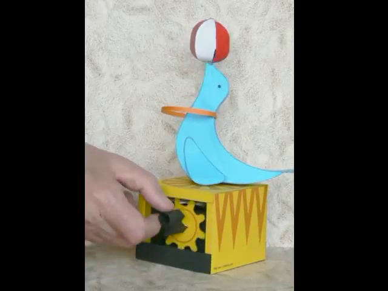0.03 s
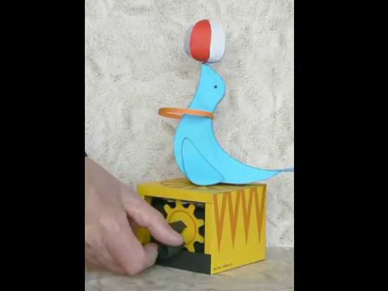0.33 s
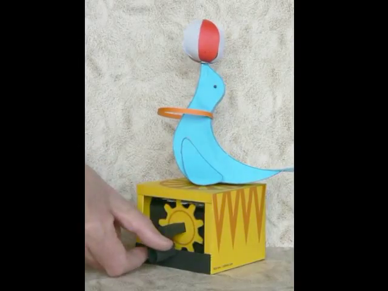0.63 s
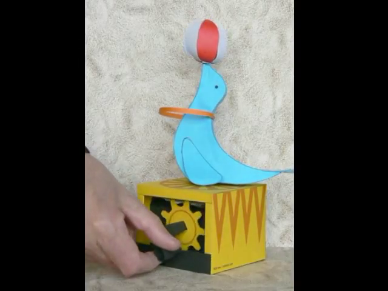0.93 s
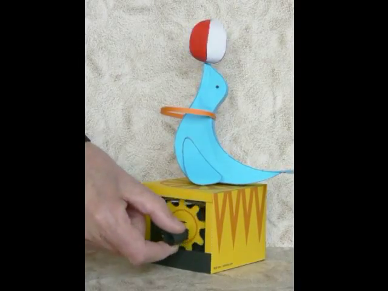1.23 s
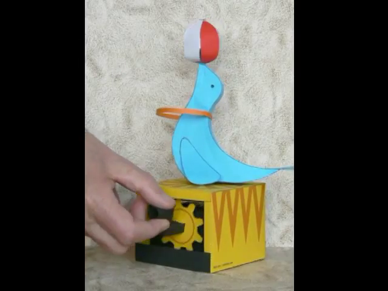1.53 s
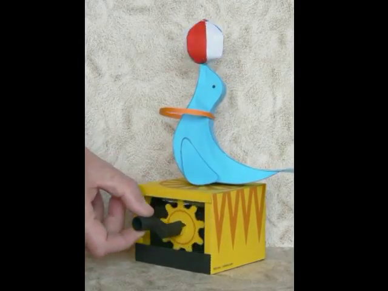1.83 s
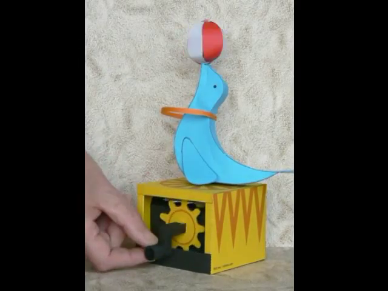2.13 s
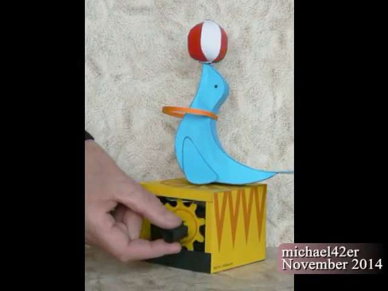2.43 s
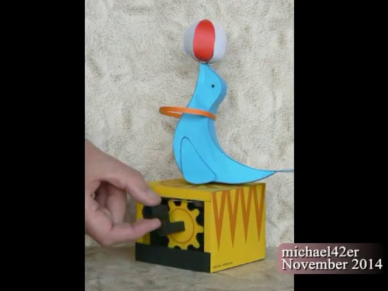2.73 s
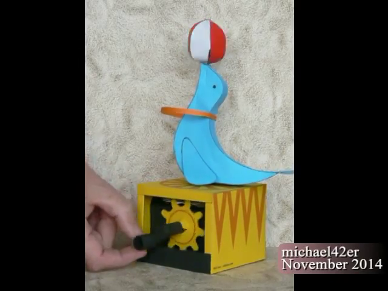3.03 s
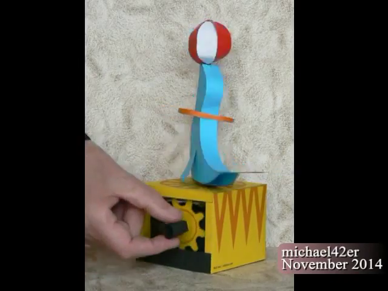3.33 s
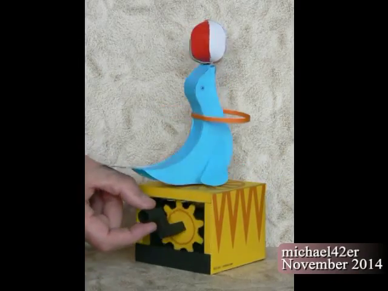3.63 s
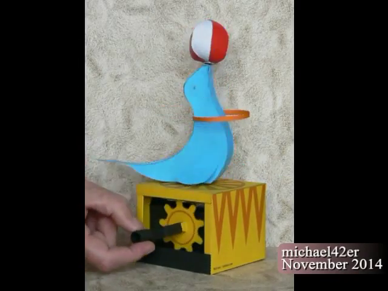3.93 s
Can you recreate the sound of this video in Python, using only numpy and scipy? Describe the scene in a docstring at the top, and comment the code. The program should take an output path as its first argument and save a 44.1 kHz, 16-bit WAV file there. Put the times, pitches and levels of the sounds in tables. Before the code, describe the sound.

Brief creaking squeaks come and go unevenly as a hand turns the card axle of a paper toy. Faint gear rubbing, soft brushes and dull finger bumps lie underneath, with steady hiss and a nearby microphone in a small room.

```python
"""A small, quiet room, where a hand cranks the card gears of a paper toy.
The card axle sticks and slips in its bearing: short gliding squeaks, some clean, some rasping.
Under them the gears rub and sound the hollow box, card brushes card, and fingers bump the box softly.
Steady hiss lies behind. A small camera holds each sample of a slow converter,
which mirrors the squeaks into a glassy treble."""
import sys
import numpy as np
from scipy import signal
from scipy.fft import rfft, irfft
from scipy.io import wavfile

SR = 44100
rng = np.random.default_rng(int(sys.argv[2]) if len(sys.argv) > 2 else 0)


def store_wav(level_fs):
    """Save 16-bit WAV to argv[1]."""
    pcm = np.round(np.clip(np.atleast_2d(level_fs), -1, 1) * 32767)
    wavfile.write(sys.argv[1], SR, pcm.T.astype(np.int16))


N = 176400
FREQS = np.arange(N // 2 + 1) * SR / N


def undb(db):
    """Decibels to gain."""
    return 10 ** (np.asarray(db) / 20)


def unit(x):
    """Scale to rms 1."""
    return x / np.sqrt(np.mean(x ** 2))


def colour(x, points):
    """EQ along a curve of points: f/Hz, gain/dB."""
    hz, db = np.array(points, float).T
    return irfft(rfft(x) * undb(np.interp(np.log(FREQS + 1), np.log(hz), db)), N)


def wander(rate_hz):
    """Smooth random modulator with rms 1 and softened peaks."""
    smooth = irfft(rfft(rng.standard_normal(N)) * np.exp(-(FREQS / rate_hz) ** 2), N)
    return unit(np.tanh(unit(smooth) / 2))


def card_box(x):
    """The hollow card box resonates in broad modes of alternating polarity."""
    # box modes: f/Hz, width/Hz, gain/dB
    modes = [(130, 124, -19), (241, 87, -2), (426, 52, 2.5), (561, 23, 1.5), (635, 76, 1), (744, 90, 2.5),
             (856, 67, 5.5), (979, 49, 2.5), (1253, 70, -0.5), (2270, 1800, -14.5)]
    f = FREQS + 1
    response = sum((-1) ** k * undb(db) / (1 + 1j * (f * f - hz * hz) / (f * width))
                   for k, (hz, width, db) in enumerate(modes))
    return irfft(rfft(x) * response, N)


def gear_rubbing(t):
    """Paper fibres catch in dense tiny ticks that sound the box."""
    # fader curve of the rubbing: t/s, relative level/dB
    fader = [(0.0, -51), (0.03, -50.5), (0.32, -52), (0.38, -56.5), (0.46, -58), (0.91, -63.5), (1.0, -47),
             (1.08, -53.5), (1.17, -50), (1.25, -55), (1.53, -49.5), (1.56, -52), (2.51, -49.5),
             (2.55, -44), (2.62, -54.5), (2.88, -48), (3.56, -53), (3.66, -46), (3.71, -53.5), (3.91, -54),
             (3.97, -41), (4.0, -63)]
    trim_db, flicker_db, graininess = 4.5, 1.33, 0.29
    ticks = rng.standard_normal(N) * np.exp(graininess * wander(420))
    when, db = np.array(fader).T
    return unit(card_box(ticks)) * undb(np.interp(t, when, db) + trim_db + flicker_db * wander(25))


def hiss():
    """A steady bed of soft noise."""
    # tone of the hiss: f/Hz, gain/dB
    eq = [(20, 3), (60, -6.5), (150, 1), (400, -5.5), (800, -4), (1500, -3), (2500, -4.5), (4000, -6.5)]
    return undb(-45) * unit(colour(rng.standard_normal(N), eq))


def axle_squeaks(t):
    """Stick-slip tones; an uneven grip shakes pitch and level, skips every other slip and adds grit."""
    # squeaks: t/s, length/s, start f/Hz, middle f/Hz, end f/Hz, level/dB,
    # 2nd harmonic/dB and 3rd harmonic/dB re the fundamental, roughness/0-1
    squeaks = [ (0.033, 0.024, 1310, 1153, 1050, -36.5, -6, -21, 0.23),
               (.053, 0.021, 1012, 999, 934, -32, -12, -23, 0.36),
               (0.387, 0.09, 1306, 1262, 1280, -42.5, -18, -20, 0.31),
               (0.418, 0.022, 1270, 1288, 1294, -22.5, -25, -41, 0.07),
               (0.427, 0.022, 1289, 1300, 1295, -21, -12.5, -21, 0.14),
               (0.447, 0.033, 1273, 1259, 1302, -24, -8.5, -19, 0.32),
               (.470, 0.013, 1262, 1408, 1462, -26, 0.5, -12, 0.25),
               (0.484, 0.036, 1528, 1444, 1466, -31.5, -14.5, -22, 0.36),
               (0.466, 0.065, 1298, 1257, 1266, -37.5, -14, -33, 0.54),
               (0.944, 0.034, 1267, 1217, 1090, -50, -25, -17, 0.35),
               (.986, 0.034, 1110, 1072, 1075, -37, -29, -21, 0),
               (1.169, 0.021, 1357, 1258, 1250, -42, -22, -22, 0.16),
               (1.195, 0.036, 982, 987, 963, -27.5, -17.5, -30, 0.14),
               (1.338, 0.049, 1003, 890, 834, -29.5, -20, -17.5, 0.25),
               (1.37, 0.021, 845, 782, 750, -25, -11, -21, 0.1),
               (1.387, 0.031, 769.5, 741.5, 766, -29.5, -11, -28, 0.18),
               (1.507, 0.018, 1279, 1235, 1070, -29, -16, -20, 0.17),
               (1.519, 0.029, 1036, 1026, 1050, -31.5, -10.5, -18.5, 0.17),
               (1.562, 0.035, 1118, 1154, 1176, -37, -17, -21.5, 0.22),
               (1.739, 0.018, 1322, 1262, 1400, -29, -18, -26, 0.17),
               (1.767, .015, 1276, 1316, 1320, -30, -16, -26, .08),
               (1.854, .014, 1004, 991, 905, -20.5, -14, -23.5, 0.06),
               (1.868, 0.028, 861, 812, 785, -24.5, -16.5, -14.5, 0.3),
               (1.898, 0.026, 766, 782, 793, -28.5, -25, -17, 0.48),
               (1.915, 0.0378, 953, 970, 1004, -26, -19, -44, 0.23),
               (1.947, 0.027, 987, 1088, 1104, -32, -10.5, -11, 0.14),
               (1.966, 0.046, 1100, 1120, 1063, -26.5, -21, -25, 0.1),
               (2.022, 0.036, 1104, 1028, 1090, -34, -23, -41, 0.35),
               (2.063, 0.032, 1257, 1260, 1283, -31.5, -23.5, -31, 0.1),
               (2.281, 0.04, 1007, 999, 976, -40.5, -16, -32, 0.55),
               (2.328, 0.027, 919, 859, 850, -37, -29, -37, 0.42),
               (2.376, 0.032, 1009, 1058, 1010, -34.5, -28, -16, 0.4),
               (2.39, 0.022, 1071, 1009, 1032, -29, -7, -25, 0.36),
               (2.414, 0.037, 981, 1031, 1028, -33, -3.5, -17, 0.3),
               (2.507, 0.045, 1106, 1060, 926, -29, -18, -19, 0.1),
               (2.538, 0.05, 1014, 990, 959, -24, -20.5, -29, 0.04),
               (2.614, 0.014, 960, 960, 1000, -30.5, -27, -30, 0.2),
               (2.637, 0.021, 1199, 1190, 1220, -32, -10, -25, 0.42),
               (2.652, 0.018, 1250, 1175, 1155, -28.5, -6, -19, 0.35),
               (2.672, 0.041, 1161, 1114, 1180, -32.5, -7.5, -17, 0),
               (2.858, 0.028, 1302, 1306, 1330, -35.5, -22, -36, .9),
               (2.971, .014, 990, 948, 920, -22.5, -19.5, -18, 0.07),
               (2.985, 0.018, 910, 873, 840, -26.5, -13.5, -20, 0.23),
               (3.018, 0.0078, 843, 938, 890, -30, -28, -31, 0.24),
               (3.034, 0.0073, 877, 855, 905, -22, -34, -37, 0.06),
               (3.087, 0.02, 973, 950, 936, -37.5, -24, -20, 0.2),
               (3.313, 0.036, 988, 956, 940, -36.5, -17, -28, 0.28),
               (3.368, 0.052, 834, 770, 843, -35.5, -21, -21, 0.52),
               (3.431, 0.047, 1454, 1322, 1310, -45.5, -24, -23, 0.9),
               (3.498, 0.028, 1132, 1095, 1060, -32, -26, -30, 0.15),
               (3.693, 0.037, 1370, 1285, 1240, -47.5, -10.5, -29, 0.47),
               (3.788, 0.014, 1290, 1297, 1300, -41, -18, -25, 0.42),
               (3.853, 0.016, 1506, 1400, 1404, -30.5, -10.5, -22, 0),
               (3.87, .060, 1369, 1269, 1200, -28.5, -4.5, -16, 0.31),
               (3.921, 0.028, 973, 750, 659, -32, -28, -16, 0.45),
               (3.951, .022, 1159, 1213, 1246, -28, -1, -10, 0.25),
               (3.978, 0.042, 1235, 1210, 1270, -24.5, -5, -17, 0.25), ]
    # skipped-slip tones at 0.5, 1.5 and 2.5 times the pitch: relative level/dB
    skip_levels = [-15, -13.5, -17]
    # tone of the grit: f/Hz, gain/dB
    grit_eq = [(200, -9), (500, -23), (750, 8), (1200, -59), (1900, -34), (2700, -10), (4000, -28.5)]
    attack_s, release_s, rolloff_db = 0.016, 0.019, -10
    jitter_share, flutter_db, rasp_db = 0.045, 8, -9  # at full roughness
    jitter, flutter, skip = wander(300), wander(160), wander(123)
    shimmer = [undb(2 * wander(60)) for _ in range(5)]
    grit = unit(colour(rng.standard_normal(N), grit_eq))
    out = np.zeros(N)
    for start, length, start_hz, mid_hz, end_hz, db, second_db, third_db, rough in squeaks:
        i = np.flatnonzero((t > start - attack_s / 2) & (t < start + length + release_s / 2))
        age = t[i] - start
        u = np.clip(age / length, 0, 1)
        # the glide bends through all three pitches
        hz = start_hz * (1 - u) * (1 - 2 * u) + mid_hz * 4 * u * (1 - u) + end_hz * u * (2 * u - 1)
        phase = 2 * np.pi * np.cumsum(hz * (1 + jitter_share * rough * jitter[i])) / SR
        fade_in = np.clip(age / attack_s + .5, 0, 1) ** 2
        fade_out = np.clip((length - age) / release_s + .5, 0, 1)
        harmonics_db = [0, second_db, third_db, third_db + rolloff_db, third_db + 2 * rolloff_db]
        tone = sum(undb(d) * shimmer[k][i] ** min(k + rough, 1) * np.sin((k + 1) * phase)
                   for k, d in enumerate(harmonics_db))
        growl = skip[i] * sum(undb(d) * np.sin((k + .5) * phase) for k, d in enumerate(skip_levels))
        shake = unit(undb(flutter_db * rough * flutter[i]))
        voice = np.sqrt(2) * (tone * shake + rough * growl)
        rasp = rough * undb(rasp_db) * grit[i]
        out[i] += undb(db) * fade_in * fade_out * (voice + rasp)
    return out


def card_slides(t):
    """Card faces brush each other in soft, grainy swishes."""
    # swishes: middle t/s, length/s, level/dB
    swishes = [(0.157, 0.031, -54), (2.405, 0.28, -60), (2.842, 0.032, -50.5), (3.248, 0.073, -42.5),
               (3.408, .10, -55), (3.653, 0.15, -48.5), (3.76, .04, -54)]
    # tone of card on card: f/Hz, gain/dB
    eq = [(300, -29), (800, 15), (1400, 2), (2100, 15), (2800, 4), (4000, -1.5)]
    swell = sum(undb(db) * np.exp(-2 * ((t - middle) / length) ** 2) for middle, length, db in swishes)
    friction = rng.standard_normal(N) * np.exp(0.15 * wander(400))
    return swell * unit(colour(friction, eq))


def finger_bumps(t):
    """The box flexes under the fingers in dull, quickly damped bumps."""
    # bumps: t/s, relative level/dB, f/Hz
    bumps = [(0.156, -46.5, 156), (0.996, -44.5, 238), (1.786, -47.5, 150), (3.635, -44, 481),
             (3.667, -46, 410), (3.775, -44, 143), (3.799, -52, 129)]
    attack_s, decay_s = 0.002, 0.018
    wobble = 1.3 * wander(89)
    out = np.zeros(N)
    for start, db, hz in bumps:
        age = np.maximum(t - start, 0)
        envelope = 2 * (1 - np.exp(-age / attack_s)) * np.exp(-age / decay_s)
        out += undb(db) * envelope * np.sin(2 * np.pi * hz * age + wobble)
    return out


def room(x, t):
    """Nearby walls add a short, dense tail."""
    t60_s, wet_db, predelay_s, build_s = 0.26, -7.5, 0.004, 0.01
    tail = rng.standard_normal(N) * undb(-60 * t / t60_s)
    tail *= np.clip((t - predelay_s) / build_s, 0, 1)
    tail /= np.sqrt(np.sum(tail ** 2))
    return x + undb(wet_db) * signal.fftconvolve(x, tail)[:N]


def scene():
    """The toy in its room over steady hiss, almost mono with a faint flicker of width."""
    # stereo side signal: f/Hz, level/dB re the mid
    side_eq = [(30, -33), (120, -42), (1000, -30), (2200, -27), (4000, -37.5)]
    balance_db = -0.07  # left re right
    t = np.arange(N) / SR
    toy = axle_squeaks(t) + gear_rubbing(t) + card_slides(t) + finger_bumps(t)
    mid = room(toy, t) + hiss()
    side = colour(mid, side_eq) * wander(260)
    return np.array([(mid + side) * undb(balance_db / 2), (mid - side) * undb(-balance_db / 2)])


def record(dry):
    """A slow converter holds each sample as a step and sits off zero; the top is cut."""
    hold_hz, mirror_boost_db, top_hz, dc_offset = 8000, 1.3, 15500, -0.045
    slow = signal.resample(dry, N * hold_hz // SR, axis=1)
    steps = signal.resample(np.repeat(slow, 20, axis=1), N, axis=1)  # steps mirror the sound upward
    bright = irfft(rfft(steps) * undb(mirror_boost_db * (FREQS > hold_hz / 2)), N)
    high_cut = signal.ellip(10, .2, 80, top_hz, fs=SR, output="sos")
    return signal.sosfilt(high_cut, bright) + dc_offset


dry = scene()
out = record(dry)
store_wav(out)
```